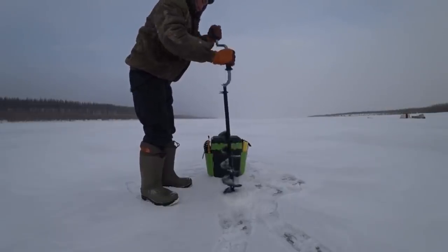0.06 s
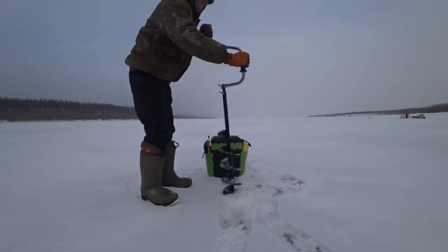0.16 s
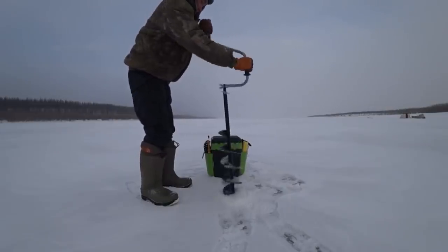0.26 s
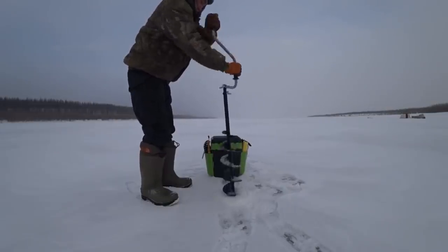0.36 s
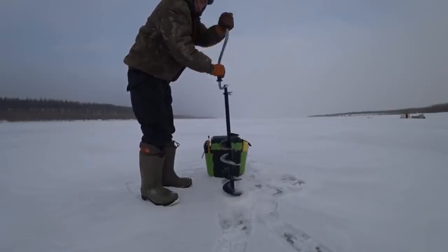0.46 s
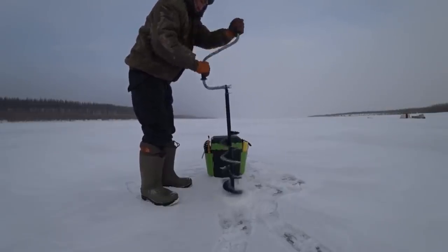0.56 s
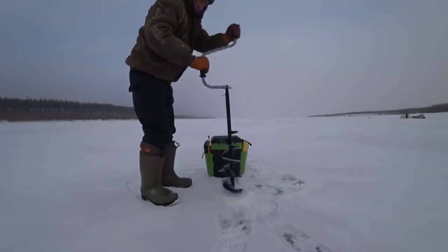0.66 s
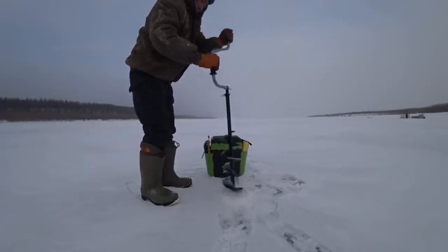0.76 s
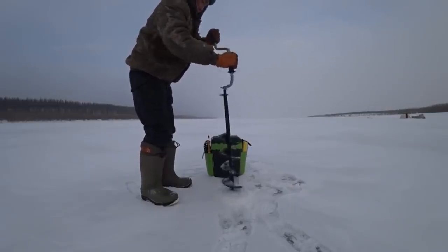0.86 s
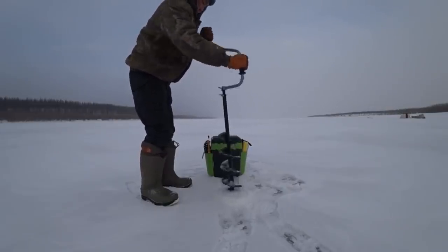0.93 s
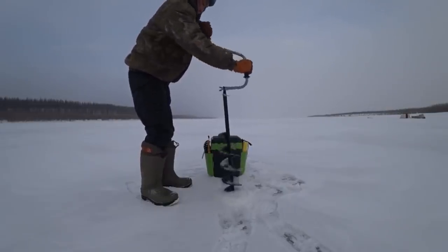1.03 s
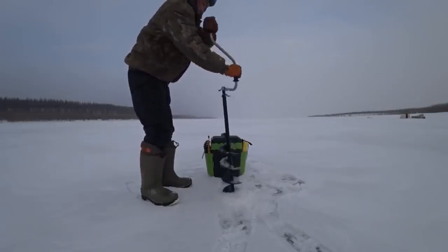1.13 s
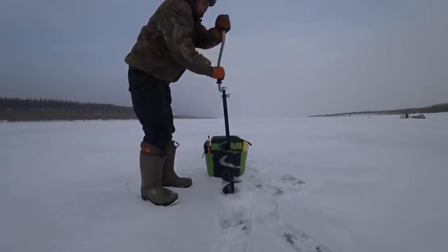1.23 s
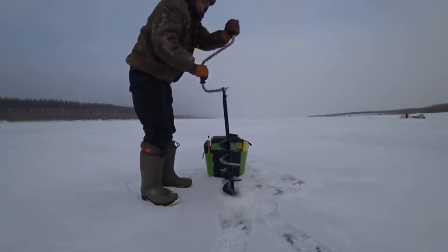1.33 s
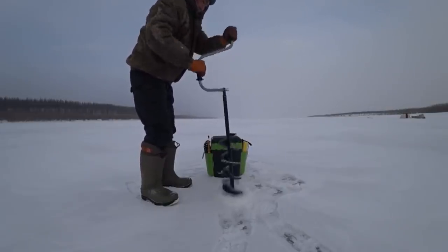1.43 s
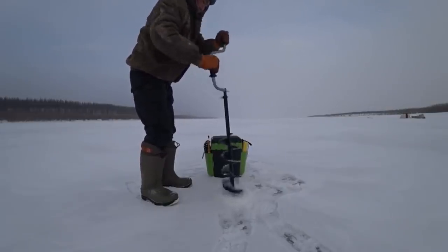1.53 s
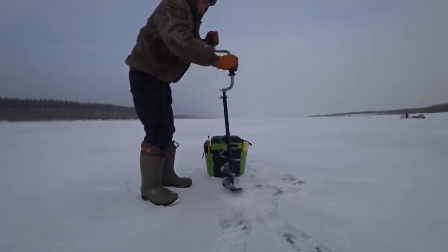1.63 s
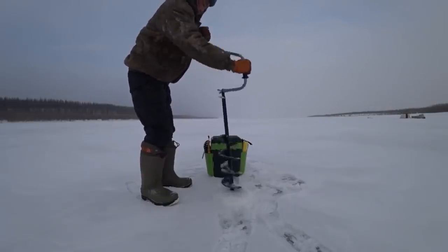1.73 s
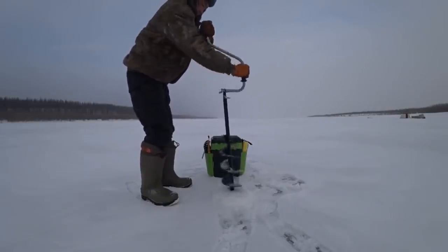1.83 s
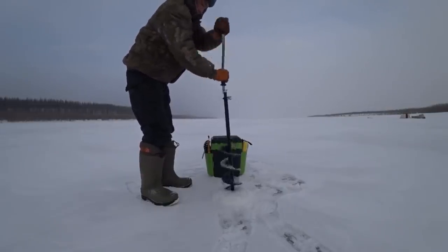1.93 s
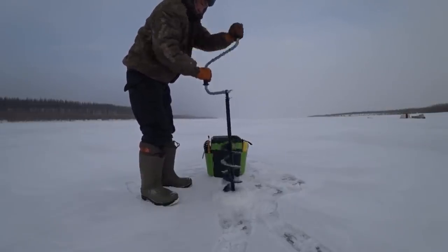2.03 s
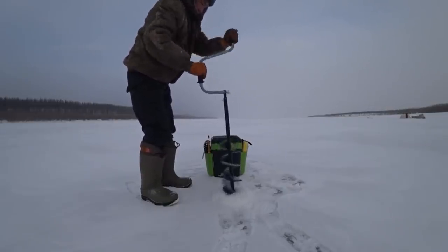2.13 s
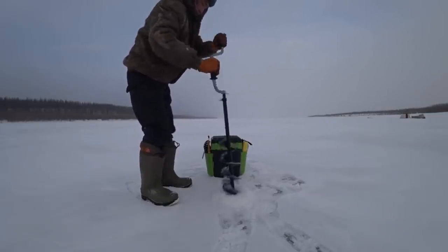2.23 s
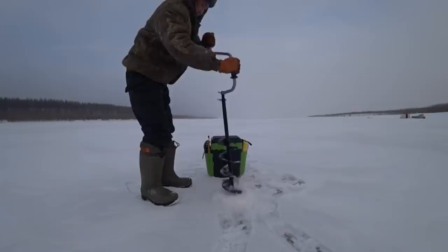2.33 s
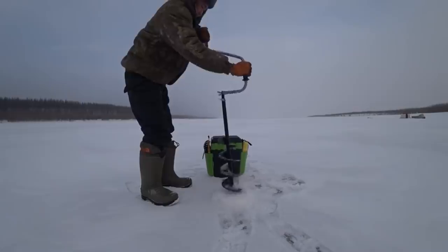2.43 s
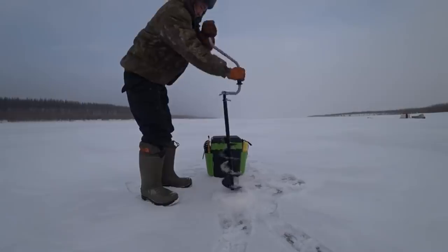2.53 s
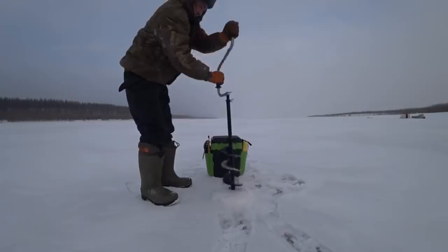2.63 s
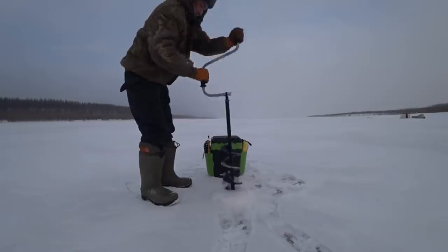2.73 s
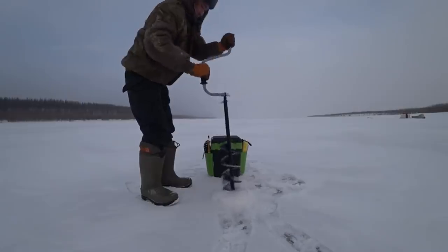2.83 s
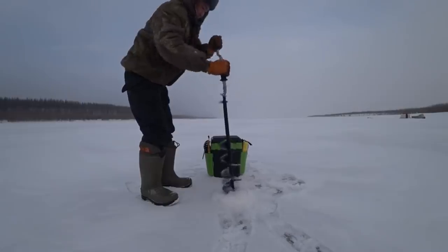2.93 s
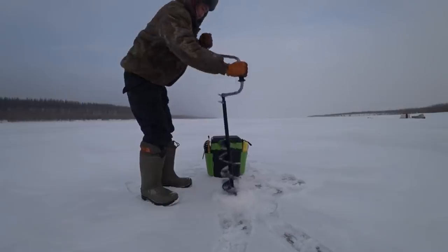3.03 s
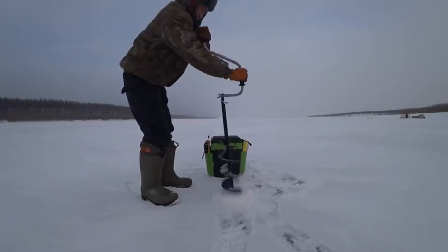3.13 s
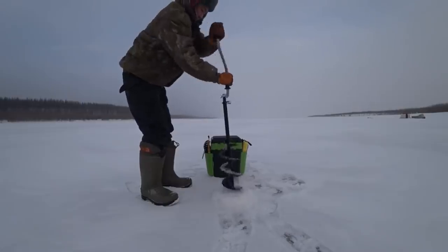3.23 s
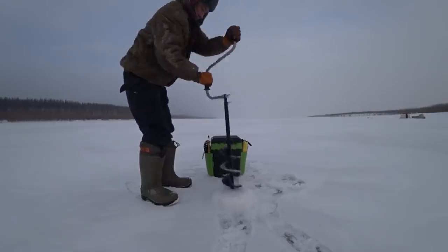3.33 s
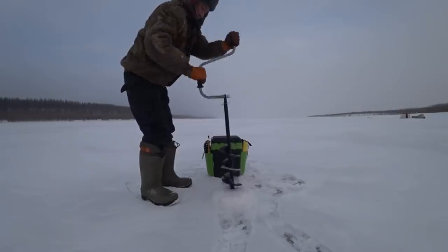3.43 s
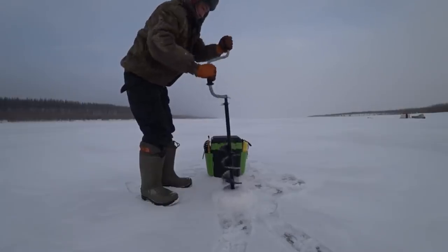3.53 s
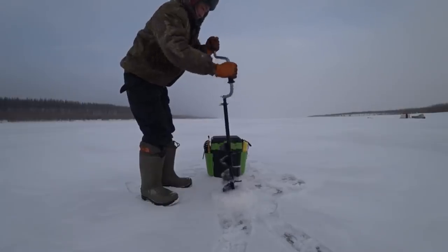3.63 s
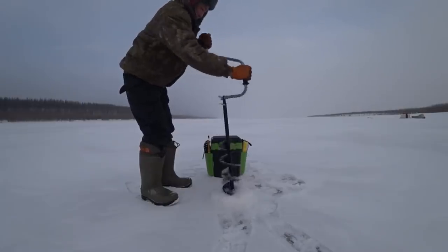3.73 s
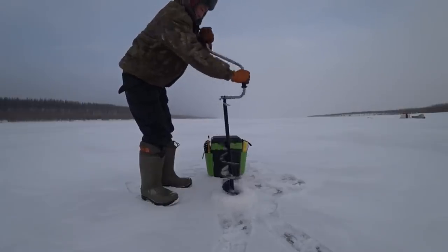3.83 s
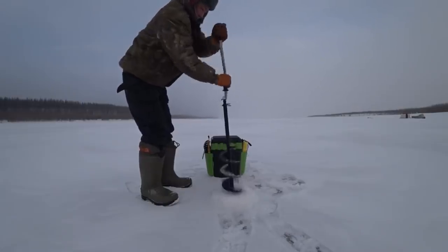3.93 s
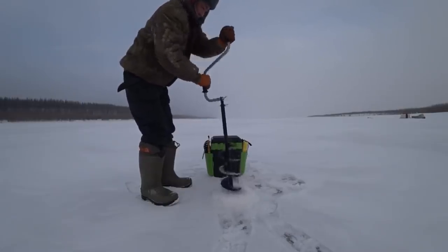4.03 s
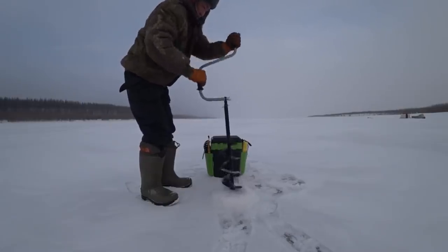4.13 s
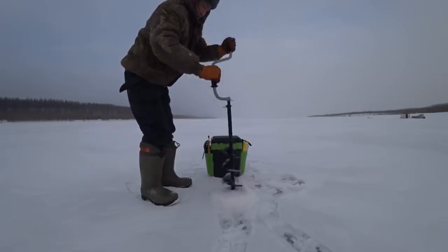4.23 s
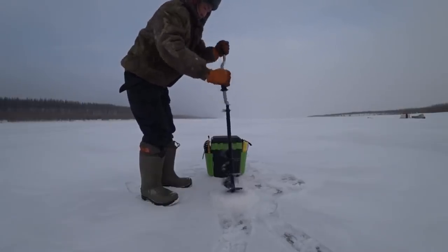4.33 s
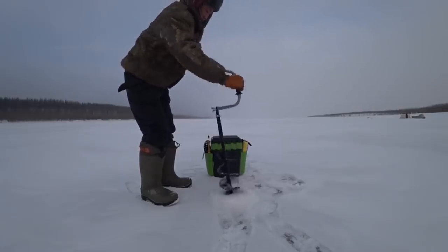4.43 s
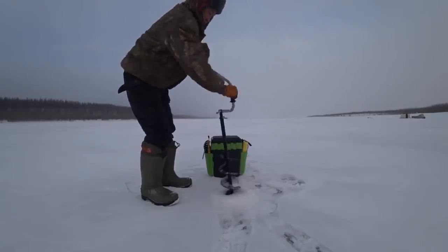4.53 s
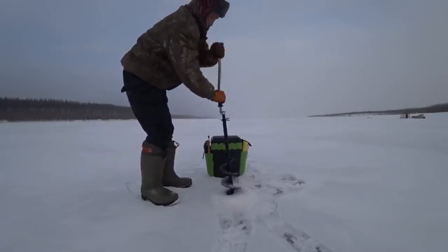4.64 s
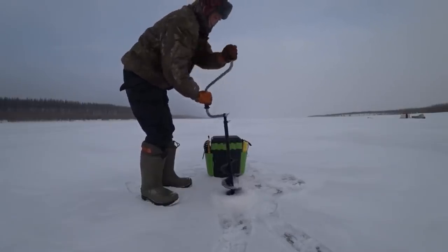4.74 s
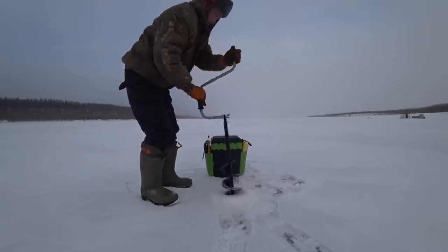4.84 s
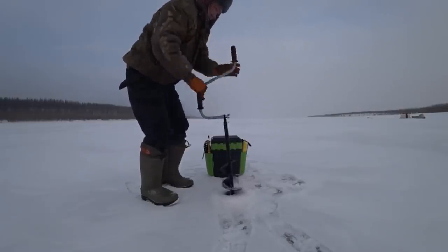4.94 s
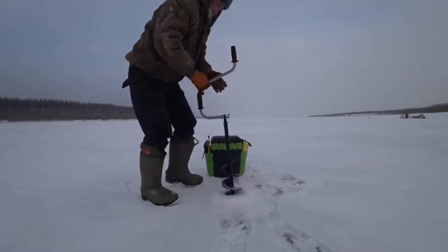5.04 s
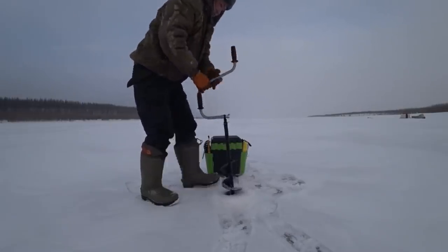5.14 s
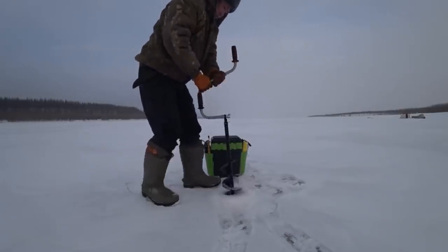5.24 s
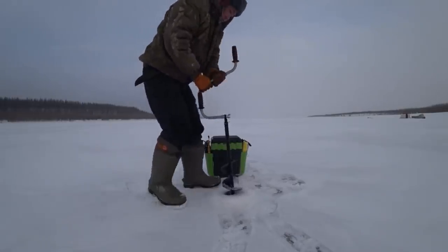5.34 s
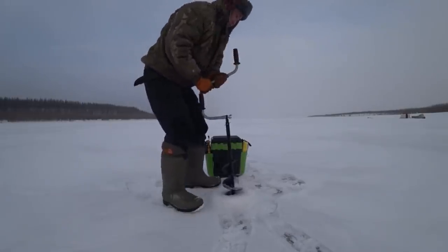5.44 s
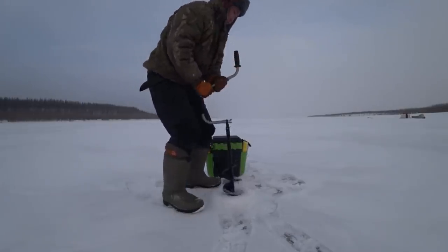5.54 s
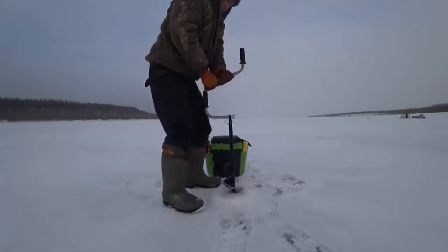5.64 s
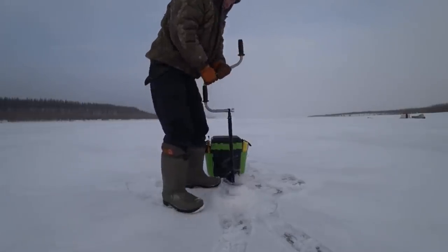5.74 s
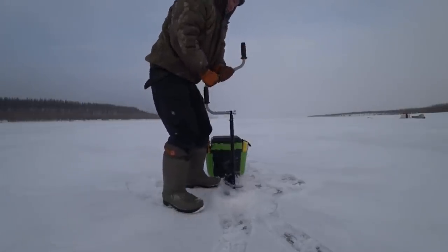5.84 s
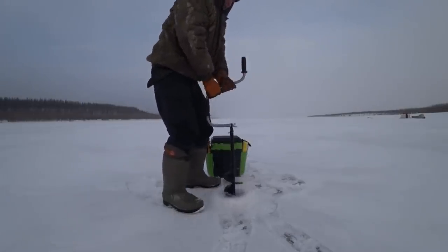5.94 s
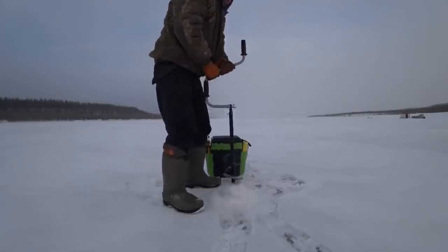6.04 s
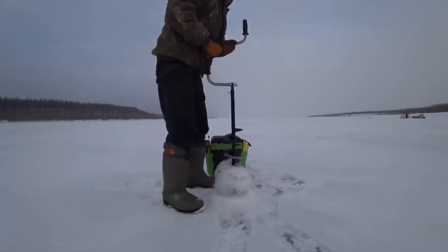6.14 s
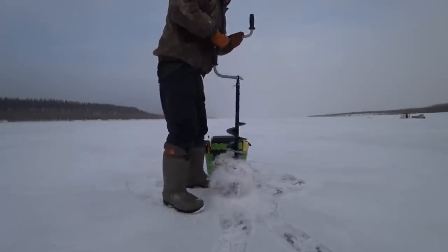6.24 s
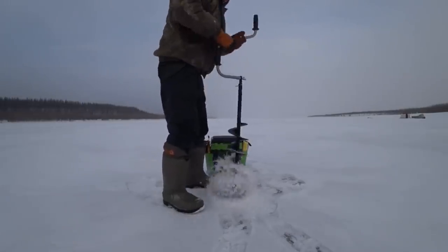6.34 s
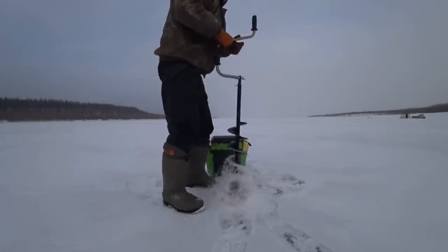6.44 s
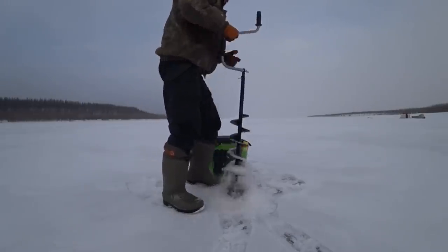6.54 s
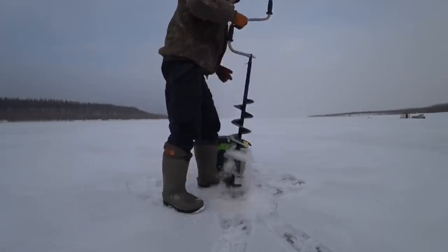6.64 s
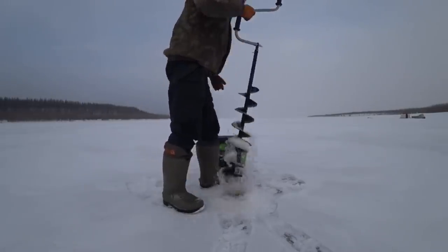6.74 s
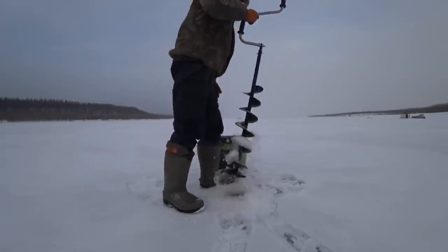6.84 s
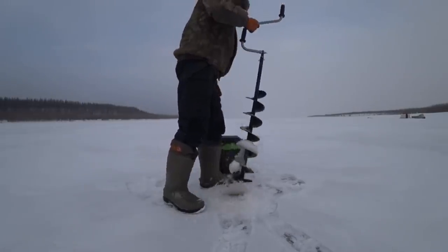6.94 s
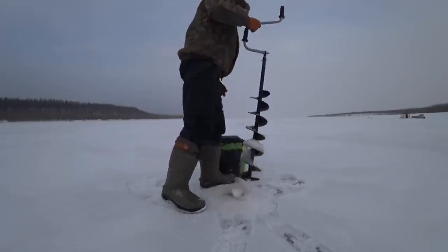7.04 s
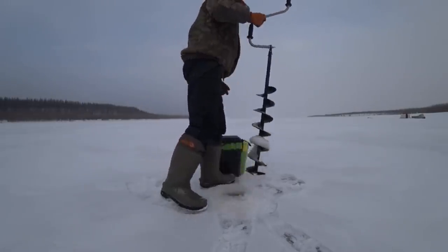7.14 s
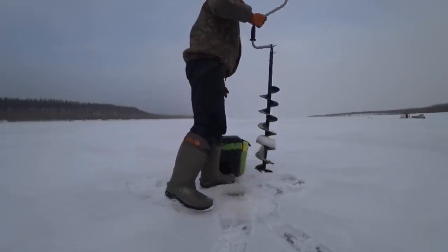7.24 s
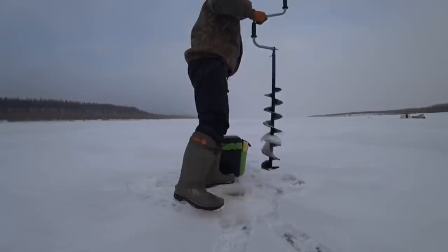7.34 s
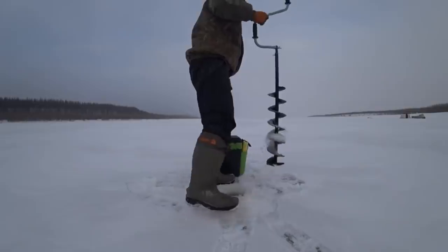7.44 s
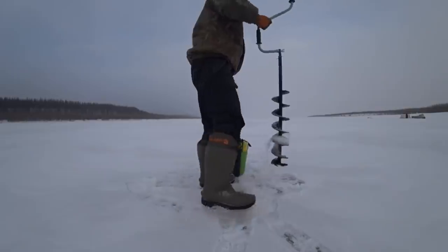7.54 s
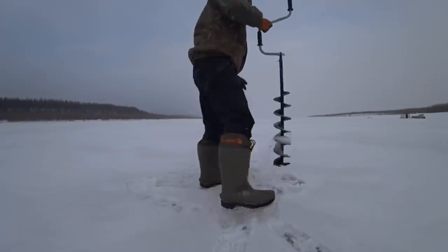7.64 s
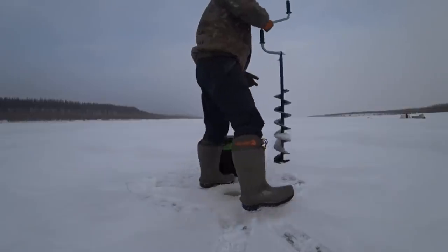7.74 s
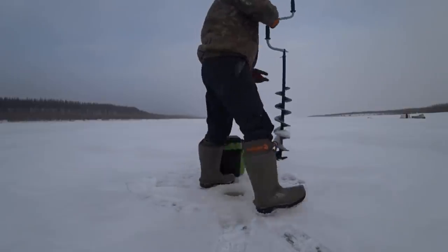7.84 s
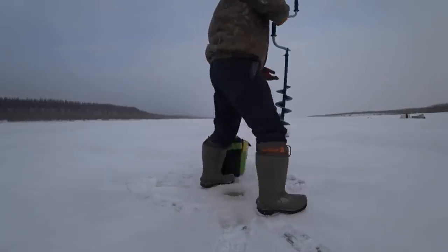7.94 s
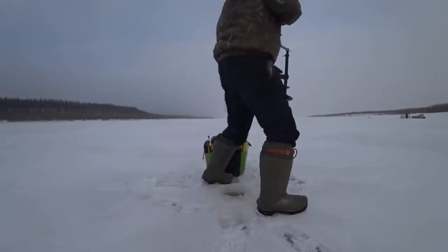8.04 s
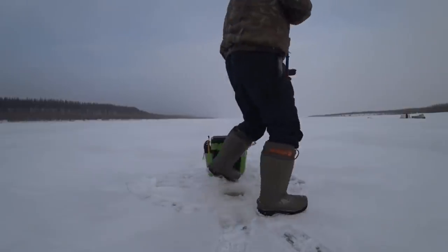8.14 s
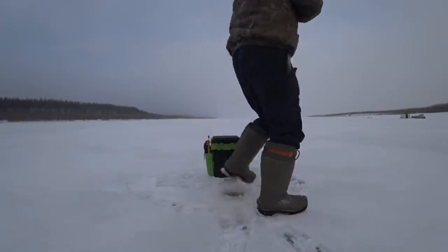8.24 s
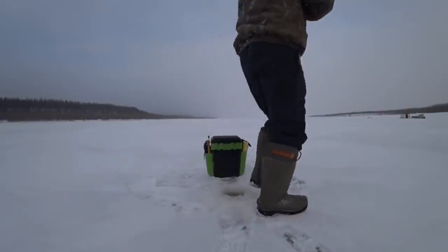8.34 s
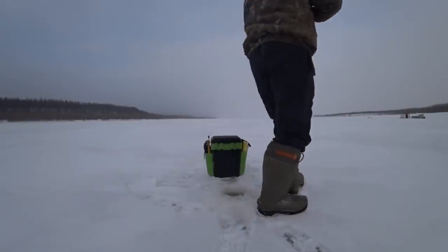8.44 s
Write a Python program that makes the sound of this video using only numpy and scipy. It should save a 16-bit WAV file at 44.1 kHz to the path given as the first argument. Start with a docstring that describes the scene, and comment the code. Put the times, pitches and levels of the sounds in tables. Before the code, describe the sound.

Turn after turn, the blades of a hand ice drill chip and scrape, ringing thinly as they cut. The drilling ends, and the screw is pulled from the hole in several quick scrapes while wet lumps knock and plop. Slush spills with a hiss, icy crust ticks, and boots shuffle and creak on snow. Faint wind flutters on the microphone throughout, in a wide outdoor stereo image.

```python
"""On a frozen river, in a light wind, a hand auger (a big ice drill) shaves its way down.
Its blades chip the ice, make the hole boom and set the steel screw ringing. The cranking stops, the
screw is jerked up in short scrapes, slush spills off it, and boots creak and tick on packed snow.
The microphone's two openings hear the middle pitches almost in opposite phase, so it sounds wide."""
import sys
import numpy as np
from scipy import signal
from scipy.fft import rfft, irfft
from scipy.io import wavfile

SR = 44100
rng = np.random.default_rng(int(sys.argv[2]) if len(sys.argv) > 2 else 0)


def master(y):
    """Save y as 16-bit WAV."""
    cut = np.clip(np.atleast_2d(y).T, -1, 1)
    pcm = np.round(cut * 32767)  # scale
    wavfile.write(sys.argv[1], SR, pcm.astype(np.int16))


N = 373968
TIME = np.arange(N) / SR


def from_db(db):
    return 10 ** (np.asarray(db) / 20)


def at_level(x, db):
    return x * from_db(db) / np.sqrt(np.mean(x ** 2))


def curve(table):
    """Read a (frequency, value) table at every frequency in the sound, on a log scale."""
    hz, value = np.transpose(table)
    return np.interp(np.log(np.arange(N // 2 + 1) * SR / N + 1), np.log(hz + 1), value)


def colour(x, table):
    """Turn each frequency up or down as the table says."""
    return irfft(rfft(x) * from_db(curve(table)), N)


def near_pitch(x, hz, width_hz):
    return signal.lfilter(*signal.iirpeak(hz, hz / width_hz, SR), x)


def ring(x, hz, width_hz):
    """Make x ring around one pitch, at an average level of 0 dB."""
    return at_level(near_pitch(x, hz, width_hz), 0)


def passband(x, kind, hz, order=2):
    return signal.sosfilt(signal.butter(order, hz, kind, fs=SR, output="sos"), x)


def band(x, kind, hz):
    """Keep the lows or the highs, at an average level of 0 dB."""
    return at_level(passband(x, kind, hz, order=3), 0)


def wander(per_s):
    """A wobble of size about 1: random values joined by straight lines."""
    steps = rng.standard_normal(size=3000)
    return 1.09 * np.interp(TIME * per_s, np.arange(len(steps)), steps)


def span(start_s, t):
    """The samples covered by a sound with clock t that starts at start_s."""
    return slice(int(start_s * SR), int(start_s * SR) + len(t))


def blip(hz, cycles, t):
    """A push that rings at one pitch for a few cycles; its peak is near 1."""
    return np.e * hz * t / cycles * np.exp(-hz * t / cycles) * np.sin(2 * np.pi * hz * t)


def chips(per_s, spread, flicker_db, flickers_per_s, surge_db):
    """Two rows of tiny cracks, the big ones rare; both rows flicker and surge together."""
    draw = rng.random((2, N)) * SR / per_s
    cracks = (draw < 1) * from_db(-spread * np.log(draw + 0.016)) * rng.standard_normal((2, N))
    wobble_db = flicker_db * wander(flickers_per_s) + surge_db * wander(flickers_per_s / 2.5)
    return cracks * from_db(5 * np.tanh(wobble_db / 5))  # never more than 5 dB either way


def loose_pieces(low_hz, high_hz, cycles, spread, count):
    """Pieces break free at random moments, each ringing at its own pitch."""
    out = np.zeros(N + SR)
    for when, pitch, size in rng.random((count, 3)):
        hz, start = low_hz * (high_hz / low_hz) ** pitch, int(when * N)
        t = np.arange(int(10 * cycles / hz * SR)) / SR
        out[start:start + len(t)] += from_db(-spread * np.log(size + 0.0077)) * blip(hz, cycles, t)
    return at_level(out[:N], 0)


# Crank turns, timed where the blades sing most; ring, boom and fine chips are relative to the cutting.
# (time [s], cutting [dB], blade ring [dB], hole boom [dB], fine chips [dB], ring dip between turns [dB])
TURNS = [(0.15, -23.5, -12, -15.5, -7.5, 4), (0.85, -23.5, -11.5, -14.5, -7, 8),
         (1.47, -23.5, -8.5, -9.5, -7.5, 5), (2.17, -23.5, -4.5, -14, -12.5, 15),
         (2.87, -25, -7, -13, -6, 15), (3.58, -25.5, -7, -13, -7.5, 12), (4.27, -25.5, -6, -15.5, -11, 17)]
# The blades lose their grip for a moment: (time [s], half-length [s], treble drop [dB])
SLIPS = [(0.078, 0.0098, 11), (0.753, 0.048, 6.5), (1.062, 0.037, 6), (1.79, 0.036, 6), (2.492, 0.026, 6),
         (2.74, 0.027, 3), (3.29, 0.035, 6), (3.554, 0.038, 9), (3.805, 0.044, 3), (4.1, 0.012, 9),
         (4.23, 0.012, 12.5)]
SLIP_SHARE = 0.48  # the part of that drop which the whole auger sound takes
BOOM_STOP_S, RING_STOP_S, CRANK_STOP_S = 4.315, 4.35, 4.383
STOP_DROP_DB, COAST_DB_PER_S, CHOKE_DB = 2, 84, 16

def crank():
    """The blade ring swells once a turn; then the blades let go and the screw coasts to rest."""
    def after(moment_s):
        return np.clip((TIME - moment_s) * 100, 0, 1)

    times, *columns = np.transpose(TURNS)
    cut_db, blade_db, hole_db, fine_db, swing_db = (np.interp(TIME, times, c) for c in columns)
    turns_done = np.interp(TIME, times, np.arange(len(times)))
    ring_mute = (1 - np.tanh(2.5 * np.cos(2 * np.pi * turns_done))) / 2  # near 1 between turns
    boom_gap = np.exp(-((TIME - 1.915) / 0.035) ** 4)  # the boom drops out briefly
    boom_mute = np.maximum(boom_gap, after(BOOM_STOP_S))
    slip_db = sum(drop * np.exp(-((TIME - at) / half_s) ** 2) for at, half_s, drop in SLIPS)
    cut_db -= STOP_DROP_DB * after(CRANK_STOP_S) + COAST_DB_PER_S * np.maximum(TIME - CRANK_STOP_S, 0)
    cut_db -= SLIP_SHARE * slip_db
    fine_db -= (1 - SLIP_SHARE) * slip_db
    blade_db -= swing_db * ring_mute + CHOKE_DB * after(RING_STOP_S)
    hole_db -= CHOKE_DB * boom_mute
    return cut_db, blade_db, hole_db, fine_db, boom_mute, ring_mute


# Hard bites into the ice: (time [s], gritty middle boost [dB], fine chip boost [dB])
BITES = [(0.388, 6, 9), (0.513, 12.5, 12), (0.7, 14, 13), (1.0, 2, 7), (1.234, 13, 5), (1.504, 3, 8),
         (1.706, 8, 7), (1.864, 3, 5.5), (2.27, 6, 4), (2.437, 6, -4), (2.536, 12, 7), (2.955, 9, 9),
         (3.255, 12, 8), (3.309, 11, 10), (3.691, 1, 11.5), (3.875, 9, -6), (4.011, 15, 17.5),
         (4.046, 11, 4), (4.326, 2, 12)]

def blade_bites(half_s=0.0058):
    """The blades dig in for an instant, boosting the grit and the fine chips."""
    return sum(np.array(db)[:, None] * np.exp(-((TIME - at) / half_s) ** 2) for at, *db in BITES)


# Tone of chipping, heard through air and ice: (frequency [Hz], level [dB])
CHIP_TONE = [(190, -62), (330, -25.5), (436, 5.5), (611, -10), (708, -7.5), (935, -3.5), (1350, -8),
             (2040, -7), (2220, -11.5), (2650, -12.5), (4840, -16.5), (6680, -11.5), (11000, -13.5),
             (14300, -107)]

def shaved_ice(cracks, grit_db, fine_db, boom_mute, ring_mute):
    """Ice breaks into coarse and fine chips; also returns the raw crunch that shakes the screw."""
    coarse = band(colour(cracks, CHIP_TONE), "low", 8250)
    grit = passband(coarse, "band", (2600, 5200))
    coarse += grit * (from_db(grit_db + 3.1 * wander(60)) - 1)
    # while the boom or the ring is muted, the chips lose that pitch too
    coarse -= boom_mute * near_pitch(coarse, 440, width_hz=220)
    coarse -= 0.5 * ring_mute * near_pitch(coarse, 2240, width_hz=300)
    crunch = chips(17000, spread=6.0, flicker_db=5.6, flickers_per_s=75, surge_db=2.8)
    fine = band(colour(crunch, CHIP_TONE), "high", 5000) * from_db(fine_db + 2.03 * wander(36))
    return from_db(-3.5) * coarse + fine, crunch


# The notes the steel screw rings at: (pitch [Hz], width [Hz], level [dB])
SCREW_NOTES = [(704, 42, -9.5), (1335, 120, -8), (3330, 80, -14.5), (3800, 150, -20), (4250, 100, -19),
               (5870, 80, -23), (6460, 45, -9.5), (6900, 130, -13), (7570, 950, -13), (7900, 220, -14)]
LINGER_DB_PER_S = 35  # the high notes die this much more slowly than the cutting

def steel_screw(shake):
    """Chipping rings the screw; the point of contact wanders, so each note comes and goes."""
    notes = sum(from_db(db + 3.6 * wander(35) + 0.33 * wander(5.92)) * ring(shake, hz, width_hz)
                for hz, width_hz, db in SCREW_NOTES)
    linger = from_db(LINGER_DB_PER_S * np.maximum(TIME - CRANK_STOP_S, 0))
    return notes + passband(notes, "high", 2600) * (linger - 1)


def singing_blades(cracks, db, pitches_hz=(2227, 2267)):
    """The two blades ring a little apart in pitch, each swelling and fading by itself."""
    return sum(from_db(db - 3 + 2.9 * wander(19)) * ring(cracks, hz, width_hz=40) for hz in pitches_hz)


def hole_boom(cracks, db, hz=431):
    """The hole booms at its lowest note; filtering twice keeps deeper sound from getting out."""
    return from_db(db + 0.5 * wander(24)) * ring(ring(cracks, hz, width_hz=38), hz, width_hz=86)


def auger():
    """The turning blades crack the ice, and the cracks ring the screw, the blades and the hole."""
    cut_db, blade_db, hole_db, fine_db, boom_mute, ring_mute = crank()
    grit_db, fine_boost_db = blade_bites()
    cracks = chips(15000, spread=1.4, flicker_db=1.64, flickers_per_s=120, surge_db=0.33)
    out, crunch = shaved_ice(cracks, grit_db, fine_db + fine_boost_db, boom_mute, ring_mute)
    shake = from_db(0.42 * grit_db) * (at_level(cracks[0], 0.84) + at_level(crunch[0], 0))
    out[0] += from_db(-4) * steel_screw(shake)
    out[0] += singing_blades(cracks[0], blade_db)
    out[0] += from_db(-11) * loose_pieces(1528, 8550, cycles=13.8, spread=2.3, count=2000)
    out[0] += hole_boom(cracks[0], hole_db)
    return from_db(cut_db) * out


# Strength of the wind at the microphone: (time [s], level [dB])
GUSTS = [(0.0, -53), (1.49, -54), (2.38, -47.5), (2.95, -58), (4.44, -51.5), (6.14, -53), (6.52, -48),
         (6.78, -58.5), (8.08, -53.5), (8.48, -63)]
# Tone of the wind's low rumble: (frequency [Hz], level [dB])
WIND_TONE = [(20, -64), (60, -11), (130, -0.5), (250, 1), (450, -7), (800, -14), (1500, -30.5)]
# Tone of the faraway hush: (frequency [Hz], level [dB])
HUSH_TONE = [(100, -24), (500, -15), (1200, -10), (5800, -21.5), (7500, -12), (11000, -15)]

def wind():
    """Light wind flutters at the microphone, over a smooth faraway hush."""
    flutter_db = np.interp(TIME, *np.transpose(GUSTS)) + 3.1 * wander(14) + 1.6 * wander(45)
    rumble = at_level(colour(rng.standard_normal((2, N)), WIND_TONE), 0)
    hush = at_level(colour(rng.standard_normal((2, N)), HUSH_TONE), -62)
    return rumble * from_db(flutter_db) + hush


# Tone of steel scraping ice: (frequency [Hz], level [dB])
SCRAPE_TONE = [(120, -55), (200, -28), (325, 0), (715, 4.5), (1380, 0.5), (1630, 0.5), (2430, -10.5),
               (3580, -11), (4600, -19.5), (6650, -11), (11000, -17.5), (13000, -90)]
# Pulls of the screw along the wall of the hole; fine chips and hollow note are relative to the pull.
# (time [s], length [s], start level [dB], end level [dB], fine chips [dB], hollow [Hz], hollow [dB])
PULLS = [(4.348, 0.035, -40, -36.5, -17, 876, 9.5), (5.53, 0.042, -35.5, -31, -9, 680, -14),
         (5.58, 0.036, -29.5, -28.5, 1, 1600, -5), (5.674, 0.066, -26, -36, -7.5, 740, -31),
         (5.696, 0.058, -24.5, -32.5, -3.5, 3600, -2), (5.892, 0.086, -34, -23, -2, 1530, -10),
         (6.039, 0.048, -23, -23, -2.5, 730, -32), (6.102, 0.057, -25.5, -29.5, -48, 940, -36),
         (6.161, 0.13, -45.5, -63.5, -13, 678, 12), (7.13, 0.041, -46, -50, 10.5, 1720, -6)]
GRAB_S, LET_GO_DB_PER_S = 0.0085, 1000
TRICKLE_S, TRICKLE_DB, TRICKLE_DB_PER_S = 0.21, -15.5, 51  # loosened ice trickles after each pull

def screw_scrapes():
    """The screw's edges grab the wall and quickly let go; lumps rattle and the hole sounds hollow."""
    cracks = chips(9000, spread=1.16, flicker_db=0.93, flickers_per_s=160, surge_db=0.54)
    coarse = band(colour(cracks, SCRAPE_TONE), "low", 5900)
    coarse += from_db(-6.5) * loose_pieces(451, 2590, cycles=6.2, spread=1.8, count=1500)
    crunch = chips(25000, spread=1.8, flicker_db=1.0, flickers_per_s=100, surge_db=0.1)
    fine = band(colour(crunch, SCRAPE_TONE), "high", 3340)
    out = np.zeros((2, N))
    for at, length, start_db, end_db, fine_db, hz, hollow_db in PULLS:
        t = np.arange(int((length + TRICKLE_S) * SR)) / SR
        part = span(at, t)
        since_end = np.maximum(t - length, 0)
        drop_db = np.maximum(-LET_GO_DB_PER_S * since_end, TRICKLE_DB - TRICKLE_DB_PER_S * since_end)
        fades = np.clip(np.minimum(t / GRAB_S, 3 * t[::-1] / TRICKLE_S), 0, 1)
        loudness = fades * from_db(np.interp(t, [0, length], [start_db, end_db]) + drop_db)
        hollow = from_db(hollow_db - LET_GO_DB_PER_S * since_end) * ring(cracks[0, part], hz, 0.07 * hz)
        scrape = from_db(-4) * coarse[:, part] + from_db(fine_db) * fine[:, part]
        out[:, part] += loudness * (scrape + hollow)
    return out


# Slides of slush and loose snow: (time [s], hold [s], crumb level [dB], spray level [dB])
SLIDES = [(4.465, 0.4, -49.5, -41.5), (4.95, 0.027, -58, -59), (5.24, 0.017, -51, -53),
          (5.284, 0.021, -58, -55), (5.5, .04, -48, -47.5), (6.293, 0.092, -54.5, -39),
          (6.426, 0.12, -48.5, -30.5), (6.585, 0.078, -44, -36.5), (6.767, 0.16, -50, -40.5),
          (6.963, .015, -62, -44), (7.002, 0.019, -52, -35.5), (7.048, 0.069, -52.5, -52),
          (7.185, 0.018, -64, -44.5), (7.72, 0.02, -71, -50.5), (7.966, 0.06, -45, -52.5)]
# Tone of the coarse crumbs: (frequency [Hz], level [dB])
CRUMB_TONE = [(300, -25), (800, 2.5), (2000, -0.5), (4000, -6), (8000, -11.5)]
# Tone of the fine spray: (frequency [Hz], level [dB])
SPRAY_TONE = [(2500, -4.5), (5000, -7), (8500, 2.5), (11000, 0.5)]
SWELL_DB_PER_S, SAG_DB_PER_S, FADE_DB_PER_S = 194, 10, 145

def sliding_slush():
    """Each slide swells, sags a little and fades: crumbs patter while spray hisses on top."""
    power = 0
    for at, hold, *levels_db in SLIDES:
        shape_db = -SWELL_DB_PER_S * np.maximum(at - TIME, 0)
        shape_db -= SAG_DB_PER_S * np.clip(TIME - at, 0, hold)
        shape_db -= FADE_DB_PER_S * np.maximum(TIME - at - hold, 0)
        power += from_db(shape_db + np.array(levels_db)[:, None]) ** 2
    crumb_gain, spray_gain = np.sqrt(power)
    patter = chips(8000, spread=1.1, flicker_db=2.7, flickers_per_s=120, surge_db=0.74)
    crumbs = band(colour(patter, CRUMB_TONE), "high", 250)
    crumbs += from_db(-3.5) * loose_pieces(353, 2310, cycles=2.0, spread=3.5, count=1400)
    hiss = chips(20000, spread=3.4, flicker_db=2.2, flickers_per_s=110, surge_db=2.3)
    spray = band(colour(hiss, SPRAY_TONE), "high", 3000)
    return crumb_gain * crumbs + spray_gain * spray


# Ice cracking, crust snapping and bits knocking: (time [s], level [dB], brightest at [Hz], fade time [s])
TICKS = [(4.511, -31, 2220, 0.0045), (4.615, -40, 3520, 0.0043), (4.712, -41.5, 5940, 0.012),
         (4.926, -40, 5000, 0.0055), (5.222, -47.5, 6000, .012), (6.83, -36, 8000, .002),
         (6.838, -34, 6560, .002), (6.921, -37, 7000, .003), (7.075, -25, 7140, 0.0028),
         (7.097, -29, 6000, .001), (7.104, -37, 8500, 0.011), (7.195, -35.5, 9400, 0.004),
         (7.212, -47, 7950, .002), (7.229, -41, 8000, .002), (7.333, -51, 8000, 0.024),
         (7.386, -50, 8000, .004), (7.479, -48.5, 955, 0.0026), (7.732, -36, 1400, 0.0028),
         (7.828, -49, 8500, 0.0095), (7.892, -46, 6000, 0.0062), (8.032, -37.5, 9000, 0.0034),
         (8.079, -37, 9500, 0.0022), (8.148, -42, 6000, 0.0011), (8.283, -43, 2600, 0.0022),
         (8.38, -46.5, 2400, 0.005), (8.381, -43, 9000, .005), (8.475, -46, 6000, 0.0036)]

def crust_ticks(snap_s=0.00036):
    """The crust gives way at once, then crumbles in a burst of hiss that dies fast."""
    out, t = np.zeros((2, N + SR)), np.arange(SR // 10) / SR
    for at, db, hz, fade_s in TICKS:
        hiss = rng.standard_normal((2, len(t)))
        loudness = from_db(db) * np.minimum(t / snap_s, 1) * np.exp(-t / fade_s)
        out[:, span(at, t)] += loudness * ring(ring(hiss, hz, width_hz=hz), hz, width_hz=1.8 * hz)
    return out[:, :N]


# The louder creaks of boots on snow: (time [s], level [dB], pitch [Hz])
CREAKS = [(4.667, -28, 510), (4.912, -25, 421), (4.924, -33, 204), (5.059, -32, 390), (5.141, -29.5, 268),
          (5.154, -29, 396), (5.227, -32, 425), (5.363, -32, 348), (5.373, -31, 400), (6.328, -33, 230),
          (6.336, -34, 262), (6.486, -35, 200), (7.391, -35, 216), (7.432, -37, 264), (7.458, -35, 396),
          (7.478, -37.5, 440), (7.541, -35, 298), (7.548, -38, 350), (7.585, -35, 300), (7.639, -35, 350),
          (7.659, -41, 600), (7.671, -34, 398), (7.732, -29.5, 540), (7.78, -35, 302), (7.817, -30.5, 453),
          (7.868, -36.5, 350), (7.896, -34, 352), (7.983, -25.5, 935), (8.097, -24.5, 424),
          (8.124, -26.5, 351), (8.15, -39, 299), (8.284, -32.5, 630), (8.384, -29, 690)]
# Weight shifting from boot to boot: (start [s], end [s])
SHUFFLES = [(4.64, 4.8), (7.203, 8.9)]
FAINT_MAX_DB, FAINT_HZ = -36, 244

def boot_creaks():
    """Snow slips under a boot with a short, dull thud; each shuffle adds seven faint ones at random."""
    faint = [(start + (end - start) * when, FAINT_MAX_DB - 5 * softness, FAINT_HZ * (0.8 + 0.4 * pitch))
             for start, end in SHUFFLES for when, softness, pitch in rng.random((7, 3))]
    out, t = np.zeros((2, N + SR)), np.arange(SR // 10) / SR
    for at, db, hz in CREAKS + faint:
        out[0, span(at, t)] += from_db(db) * blip(hz, cycles=0.36, t=t)
    return out[:, :N]


# Wet lumps landing, knocking and gurgling in the hole: (time [s], level [dB], pitch [Hz], ring [cycles])
SPLATS = [(5.559, -34, 394, 0.92), (5.605, -21.5, 890, 2.7), (5.684, -22.5, 687, 3.4),
          (5.702, -19.5, 363, 1.3), (5.735, -27, 447, 1.8), (5.972, -21.5, 807, 4.3),
          (6.04, -23.5, 350, 0.95), (6.062, -31, 700, 11), (6.118, -29, 511, 5.1), (6.131, -31, 1800, 6.5),
          (6.148, -27, 880, 3.5), (6.438, -43, 420, 1.5), (6.486, -33, 440, 0.73), (6.569, -36, 1010, 1.8),
          (6.572, -36, 2270, 2.5), (6.604, -35, 2250, 3), (6.604, -39, 520, 1.4), (6.618, -41, 330, 1),
          (6.665, -38.5, 764, 3.4), (6.709, -45, 1200, 3), (6.748, -40, 1260, 2), (6.882, -43, 1330, 1.6),
          (6.916, -39, 270, 0.64), (6.945, -39, 270, 0.59), (6.965, -42, 307, 1.3), (7.078, -42, 250, 0.65),
          (7.039, -43, 1380, 2.5), (7.453, -58, 5360, 14), (7.453, -48, 7700, 15)]

def wet_lumps():
    """Each lump of slush plops, ringing briefly at one pitch."""
    out, t = np.zeros((2, N)), np.arange(SR // 10) / SR
    for at, db, hz, cycles in SPLATS:
        out[0, span(at, t)] += from_db(db) * blip(hz, cycles, t)
    return out


# How far the left side's wave runs ahead of the right's: (frequency [Hz], phase lead [radians])
LEFT_LEAD = [(40, 0.34), (170, 1.6), (300, 2.11), (900, 2.45), (1600, 2.46), (2600, 2.31), (4200, 1.99),
             (6500, 1.56), (11000, 1.16)]
# Level of the left side against the right: (frequency [Hz], left minus right [dB])
LEFT_LEVEL = [(60, -3), (190, 1), (340, -4.5), (620, -2.5), (1980, -1.5), (3540, -2.5), (6340, -4.0),
              (11400, -6)]
# Sound that the two sides do not share: (frequency [Hz], level [dB])
UNSHARED = [(50, 0), (200, -5), (420, -19), (2300, -16), (3000, -11), (5000, -9), (7000, -11), (11000, -9)]

def microphone_openings(x):
    """Row 0 goes to both sides, row 1 sets them apart; the left is shifted in phase and level."""
    shared, apart = rfft(x[0]), rfft(x[1]) * from_db(curve(UNSHARED))
    left_shift = from_db(curve(LEFT_LEVEL)) * np.exp(1j * curve(LEFT_LEAD))
    gain = 2 / np.abs(1 + left_shift)  # left plus right keeps the tone of the shared sound
    return irfft(gain * np.array([left_shift * (shared + apart), shared - apart]), N)


def scene():
    """Drilling, pulling out, slush, boots and wind, mixed and spread to left and right."""
    ice_work = auger() + screw_scrapes() + sliding_slush() + wet_lumps()
    return microphone_openings(ice_work + boot_creaks() + crust_ticks() + wind())


def record(dry):
    """Drop the deepest rumble, round off the loudest peaks and cut the top treble steeply."""
    rounded = 0.85 * np.tanh(passband(dry, "high", 45) / 0.85)
    return signal.sosfilt(signal.ellip(16, 0.3, 70, 11030, fs=SR, output="sos"), rounded)


dry = scene()
out = record(dry)
master(out)
```